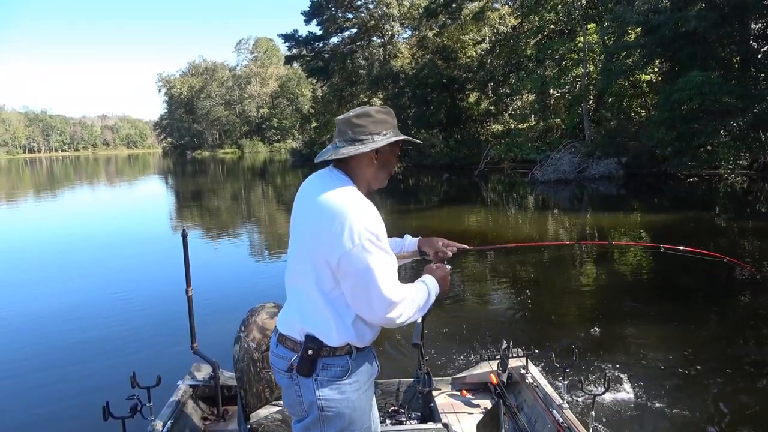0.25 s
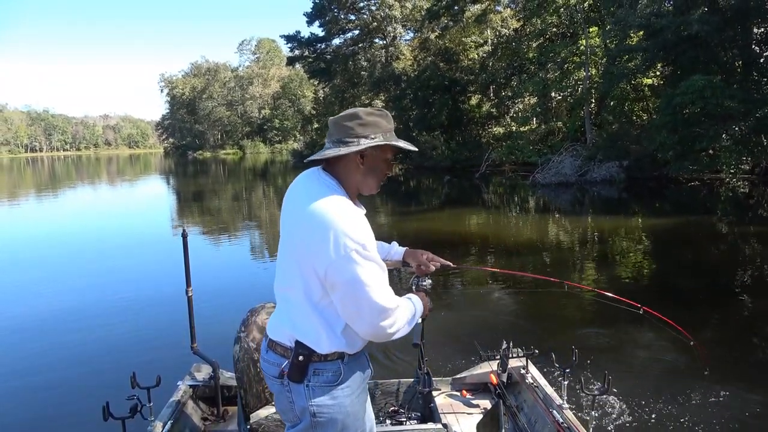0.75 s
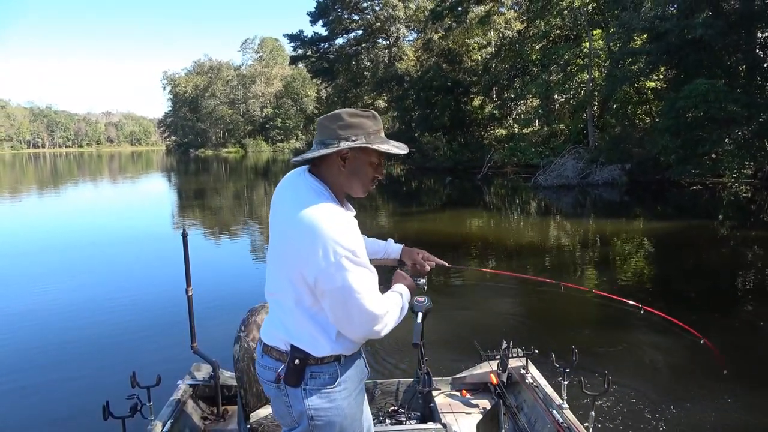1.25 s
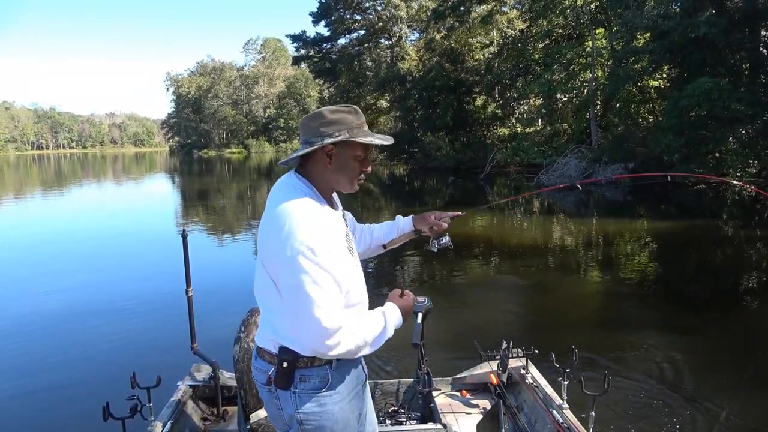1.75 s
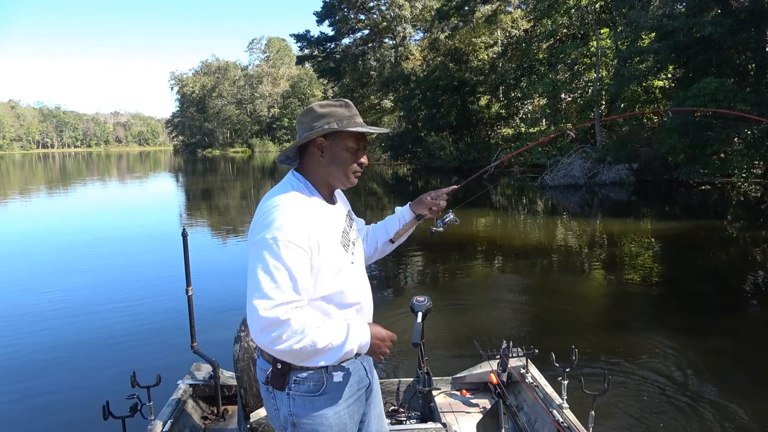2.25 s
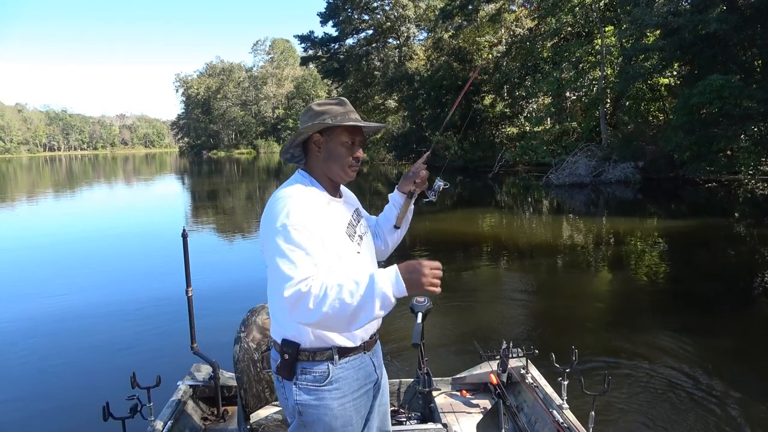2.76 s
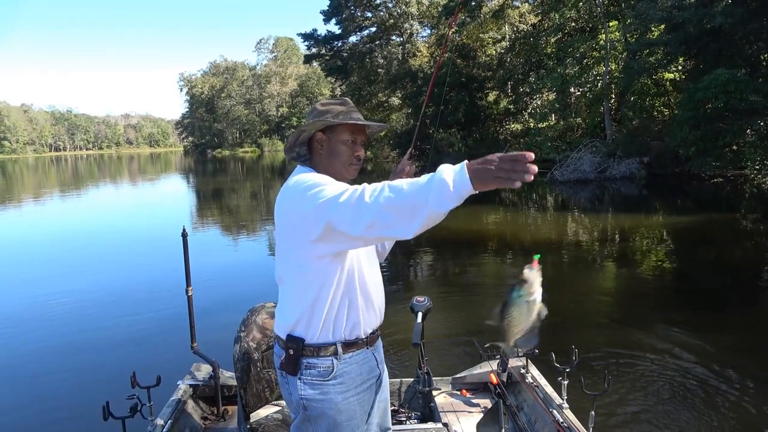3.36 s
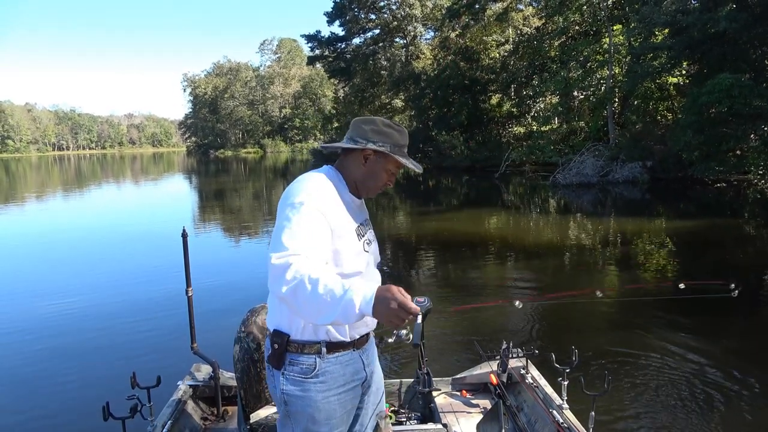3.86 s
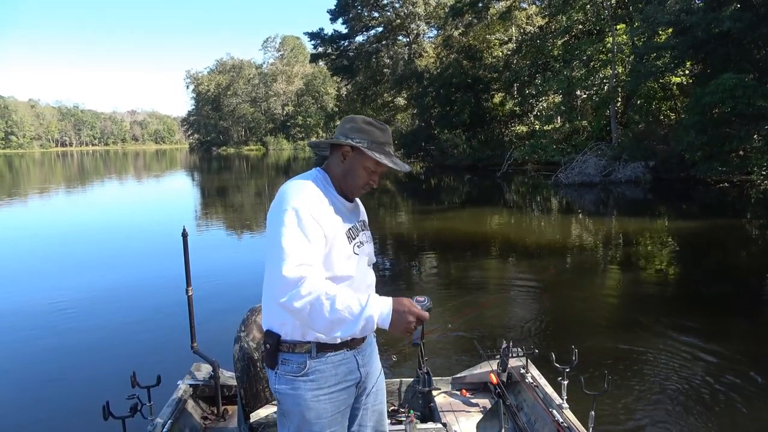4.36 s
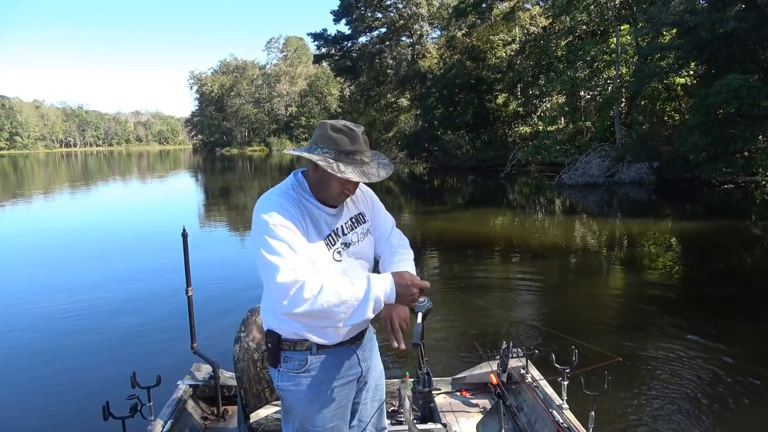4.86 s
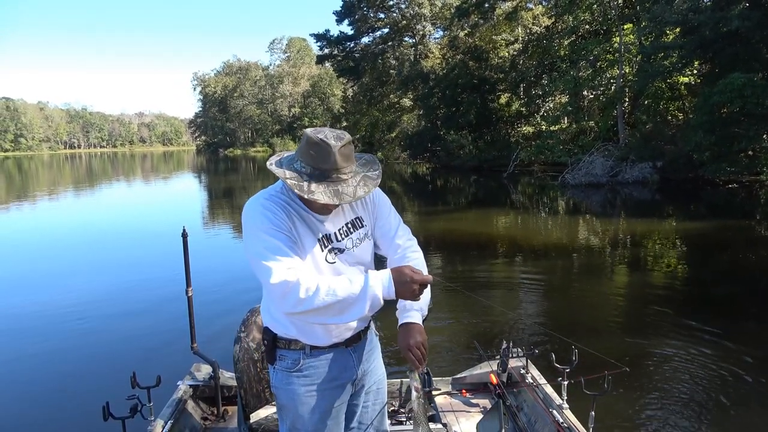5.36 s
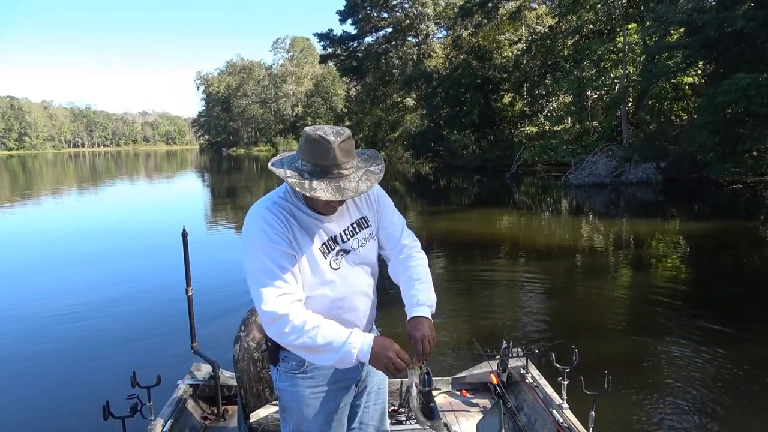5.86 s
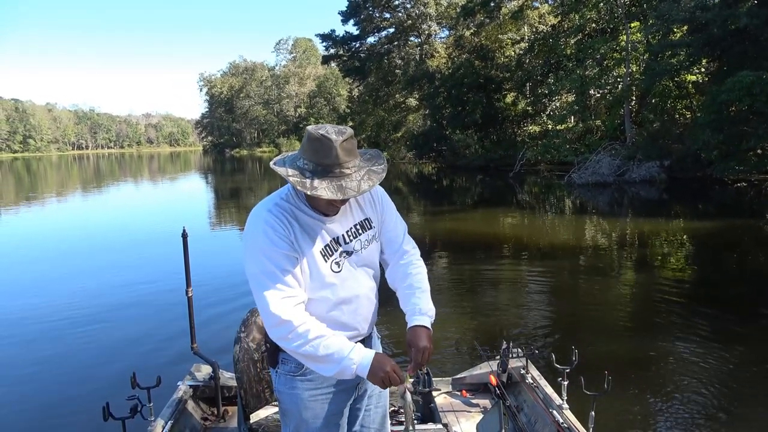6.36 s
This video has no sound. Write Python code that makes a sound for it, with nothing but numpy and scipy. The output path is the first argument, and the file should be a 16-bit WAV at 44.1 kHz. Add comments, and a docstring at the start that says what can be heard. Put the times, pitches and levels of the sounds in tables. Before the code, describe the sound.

A fish thrashes at the surface right from the start, with a loud burst of bubbling splash, spray, gurgles and smacks that thins to drips within about two seconds. Then line and reel tick, sleeves rustle, and feet and gear knock the hull. Near the end hard tackle clacks snap over the deck. Calm open lake, very soft airy hush, fairly close microphone, mono.

```python
"""A hooked fish thrashes beside a small boat on a calm lake, under a soft open-air hush of shaped noise.
Water: clouds of ringing bubbles, quick rising squirts, gurgles and spray; then a lift out, dripping.
Line and reel tick (noise snaps), clothes rustle (dense slips), line squeaks, feet and gear bump the hull (modes).
Late on, hard clacks of tackle ring close by over the deck, and a faint thin whine flutters between them."""
import sys
import numpy as np
from scipy import signal
from scipy.fft import rfft, irfft
from scipy.io import wavfile

SR = 44100
rng = np.random.default_rng(int(sys.argv[2]) if len(sys.argv) > 2 else 0)


def unload_wav(signal):
    """Save mono or channel-first audio to the path in sys.argv[1] as 16-bit WAV at rate SR, clipped to [-1, 1]."""
    wavfile.write(
        sys.argv[1],
        SR,
        np.round(np.clip(np.atleast_2d(signal).T, -1, 1) * 32767).astype(np.int16),
    )


N = 291280
T = np.arange(N) / SR
AGE = T[:int(.4 * SR)]  # time axis of one short event


def amp(db):
    """Decibels to gain."""
    return 10 ** (np.asarray(db) / 20)


def unit(x):
    """Scale to rms 1."""
    return x / np.sqrt(np.mean(x ** 2))


def fade(t60_s):
    """Exponential decay, -60 dB at t60_s."""
    return np.exp(-np.log(1000) * AGE / max(t60_s, 1e-4))


def swell_fade(t, swell_s, t60_s):
    """Smooth rise, then exponential decay."""
    rise = np.sin(np.pi / 2 * np.minimum(t / swell_s, 1)) ** 2
    return rise * np.exp(-np.log(1000) * np.maximum(t - swell_s, 0) / t60_s)


def surge(start_s, swell_s, t60_s, hold_s=0):
    """Envelope of one movement: swell, optional hold, decay."""
    age = np.maximum(T - start_s, 0)
    held_age = age - np.clip(age - swell_s, 0, hold_s)
    return swell_fade(held_age, max(swell_s, 1e-4), t60_s)


def add(out, start_s, sound):
    """Mix a sound in at start_s."""
    i = max(int(start_s * SR), 0)
    out[i:i + len(sound)] += sound[:N - i]


def colour(x, points):
    """Causal minimum-phase filter through (Hz, dB) points, unit gain for white noise."""
    hz, db = np.transpose(points)
    size = 8192
    log_bins = np.log(np.fft.rfftfreq(size, 1 / SR) + 1)
    log_gain = np.log(amp(np.interp(log_bins, np.log(hz), db)))
    cepstrum = irfft(log_gain)
    cepstrum[1:size // 2] *= 2  # fold to minimum phase
    cepstrum[size // 2:] = 0
    response = irfft(np.exp(rfft(cepstrum)))
    return signal.fftconvolve(x, response / np.linalg.norm(response))[:len(x)]


def walk(points_per_s):
    """Random points joined by lines, rms 1."""
    points = rng.standard_normal(int(T[-1] * points_per_s) + 2)
    return unit(np.interp(T * points_per_s, np.arange(len(points)), points))


def crackle(hits_per_s, spread_db):
    """Dense tiny impacts of uneven size and random sign, rms 1."""
    size = amp(spread_db * np.minimum(rng.exponential(size=N), 4))
    hits = rng.random(N) < hits_per_s / SR
    return unit(hits * size * rng.choice([-1, 1], N))


def ring(modes):
    """Free ringing of a struck object: decaying sine modes, starting at about rms 1."""
    waves = np.zeros(len(AGE))
    for hz, db, t60_s in modes:
        waves += amp(db) * fade(t60_s) * np.sin(2 * np.pi * hz * AGE + rng.uniform(0, 2 * np.pi))
    return waves / np.sqrt(sum(amp(db) ** 2 for _, db, _ in modes) / 2)


def band(hz, points_per_s):
    """Narrow noise around a pitch curve: two random walks on a quadrature carrier, about rms 1."""
    phase = 2 * np.pi * np.cumsum(hz * np.ones(N)) / SR
    return walk(points_per_s) * np.sin(phase) + walk(points_per_s) * np.cos(phase)


def echo(x, t60_s, points):
    """Diffuse reflections: convolution with a coloured, decaying noise tail."""
    tail = rng.standard_normal(len(AGE)) * fade(t60_s) * (1 - np.exp(-AGE / 0.0013))
    tail = colour(tail, points)
    return signal.fftconvolve(x, tail / np.linalg.norm(tail))[:N]


# hush spectrum: pitch_hz [Hz], density_db [dB per Hz, relative]
AIR_SPECTRUM = [(12, -46), (20, 5.5), (44, -5), (101, -8), (134, -11.5), (168, -9.5), (459, -11),
                (499, -11), (780, -6), (1610, -23), (3340, -29.5), (3840, -30.5), (5080, -34),
                (7310, -40.5), (16000, -42)]
AIR_DB = -47.5


def air():
    """Hush of distant trees over open water: coloured noise, gently wavering."""
    hush = unit(colour(rng.standard_normal(N), AIR_SPECTRUM))
    return amp(AIR_DB + .5 * walk(2.78)) * hush


def bubble(hz, swell_s, t60_s, glide_octaves_per_s):
    """Trapped air swells into ringing and dies away while its pitch slides."""
    t = AGE[:int((swell_s + t60_s) * SR) + 2]
    pitch_hz = np.minimum(hz * 2 ** (glide_octaves_per_s * t), SR / 3)
    return swell_fade(t, swell_s, t60_s) * np.sin(2 * np.pi * np.cumsum(pitch_hz) / SR)


WATER_END_S = 2.4


def cloud(low_hz, high_hz, cycles, spread_db, rise_octaves, count):
    """Many bubbles up to WATER_END_S, lower ones ringing longer; most rise in pitch, some sink."""
    out = np.zeros(N)
    for k, (when, pitch, life, size, slide) in enumerate(rng.random((count, 5))):
        hz = low_hz * (high_hz / low_hz) ** pitch
        t60_s = cycles * (.5 + life) / hz
        sound = bubble(hz, t60_s * 0.17, t60_s, rise_octaves * (slide - .25) / t60_s)
        gain = amp(spread_db * size ** 3) * np.sqrt(hz)
        add(out, (k + when) / count * WATER_END_S, gain * sound)
    return out / np.sqrt(np.mean(out[T < WATER_END_S] ** 2))


# foam and mist spectra: pitch_hz [Hz], density_db [dB per Hz, relative]
FOAM_COLOUR = [(40, -31), (150, -21), (280, -20), (480, -6.5), (1100, -3), (1700, -8.5), (2800, -4.5),
               (8000, -31)]
MIST_COLOUR = [(100, -70), (700, 0), (1400, 4.5), (2200, 3), (3600, -8.5), (5400, -4), (7000, -14),
               (10000, -21.5), (14000, -28), (16000, -30)]
# three thrashes, a swirl, the lift out: start_s [s], swell_s [s], t60_s [s], churn_db [dB], spray_db [dB]
WATER_SURGES = [(0.0, 0.001, 0.58, -21.5, -33), (0.089, 0.12, 0.68, -38, -38.5),
                (.24, 0.21, 2.04, -45, -35.5), (.98, 0.17, 0.67, -48.5, -68), (1.6, 0.38, 1.46, -62, -47.5)]


def splash():
    """Fish churns large bubbles and foam, throws small bubbles and mist; each movement is a surge."""
    large = cloud(377.4, 1955, cycles=20.5, spread_db=16.5, rise_octaves=0.84, count=1200)
    small = cloud(1400, 5400, cycles=28, spread_db=15, rise_octaves=.45, count=2600)
    foam = colour(crackle(3000, 1.1), FOAM_COLOUR)
    mist = colour(crackle(2500, 4.06), MIST_COLOUR) * amp(4.4 * walk(59.27))
    churn = large + .5 * foam
    spray = small + .9 * mist
    out = np.zeros(N)
    for start_s, swell_s, t60_s, churn_db, spray_db in WATER_SURGES:
        water = amp(churn_db) * churn + amp(spray_db) * spray
        out += surge(start_s, swell_s, t60_s) * water
    return out


BUBBLE_SWELL_SHARE, BUBBLE_RISE_OCTAVES = 0.041, 0.24  # both per t60


def gulp(hz, cycles):
    """Bubble under water: lower pitch swells and fades slower; pitch rises as it floats up."""
    t60_s = cycles / hz
    return bubble(hz, BUBBLE_SWELL_SHARE * t60_s, t60_s, BUBBLE_RISE_OCTAVES / t60_s)


# single bubbles, low and high: start_s [s], pitch_hz [Hz], peak_db [dB], cycles [cycles per t60]
CLEAR_BUBBLES = [(0, 770, -9.5, 9.2), (.0135, 755, -17, 12), (.017, 960, -11, 34), (0.0937, 556, -12.5, 26),
                 (.135, 1240, -22, 50), (.2, 1240, -15, 21), (.199, 438, -24.5, 39),
                 (.207, 281, -28.5, 12.5), (0.227, 556, -21, 27), (.268, 1027, -24, 35),
                 (.379, 1107, -19.5, 52), (0.4274, 970, -11, 28), (.687, 780, -26, 30),
                 (.733, 838, -23.5, 55), (.821, 3250, -25.5, 60), (.849, 880, -23.5, 20),
                 (1.285, 920, -35.5, 104), (1.947, 1390, -17, 10.7), (1.984, 875, -28, 55),
                 (1.998, 2930, -20, 17)]


def clear_bubbles():
    """Clear single bubbles, low and high, in the churned water and under falling drops."""
    out = np.zeros(N)
    for start_s, pitch_hz, peak_db, cycles in CLEAR_BUBBLES:
        add(out, start_s, amp(peak_db) * gulp(pitch_hz, cycles))
    return out


# air pockets pinching shut: start_s [s], start_hz [Hz], end_hz [Hz], peak_db [dB]
SQUIRT_SWEEPS = [(.072, 2800, 4800, -27), (.137, 1780, 5800, -25), (0.161, 3700, 3980, -24),
                 (.36, 2410, 5670, -27.5), (.394, 2300, 6500, -28), (0.484, 1940, 3470, -20),
                 (.6038, 1775, 5640, -16.5), (.788, 4700, 9800, -30), (.799, 4500, 6760, -28),
                 (1.849, 5430, 8200, -42.5), (1.938, 3840, 5330, -33)]
SQUIRT_S = 0.00737


def squirts():
    """Air pockets pinch shut: short sine sweeps, rising geometrically."""
    out = np.zeros(N)
    for start_s, start_hz, end_hz, peak_db in SQUIRT_SWEEPS:
        hz = np.geomspace(start_hz, end_hz, int(SQUIRT_S * SR))
        sweep = np.hanning(len(hz)) * np.sin(2 * np.pi * np.cumsum(hz) / SR)
        add(out, start_s, amp(peak_db) * sweep)
    return out


# falling spray sheets: start_s [s], level_db [dB], swell_s [s], t60_s [s]
SPRAY_SHEETS = [(.076, -28.5, 0.0064, 0.083), (.199, -29.5, .001, 0.048), (0.281, -28, 0.018, 0.16),
                (.752, -33.5, .003, 0.1), (1.822, -40, 0.0039, 0.095), (1.984, -38, 0.019, 0.15)]
# patter spectrum: pitch_hz [Hz], density_db [dB per Hz, relative]
PATTER_COLOUR = [(200, -17), (1200, -22), (2200, 7.5), (5400, 2), (7000, -11.5), (10000, -15), (14000, -27),
                 (16000, -26)]


def sheets():
    """Sheets of spray fall back: enveloped patter of dense tiny impacts."""
    out = np.zeros(N)
    patter = colour(crackle(5000, 2.5), PATTER_COLOUR)
    for start_s, level_db, swell_s, t60_s in SPRAY_SHEETS:
        piece = patter[int(start_s * SR):][:len(AGE)]
        add(out, start_s, amp(level_db) * swell_fade(AGE, swell_s, t60_s) * piece)
    return out


# bubble runs: start_s [s], length_s [s], first_hz [Hz], last_hz [Hz], mean_peak_db [dB]
GURGLE_RUNS = [(0.101, .13, 924, 399, -32.5), (0.349, 0.053, 696, 1050, -30), (.487, 0.069, 1375, 995, -26),
               (.665, 0.062, 595, 1180, -28.5)]
GURGLE_BUBBLES_PER_S, GURGLE_CYCLES = 65, 35


def gurgles():
    """Runs of gulps at uneven intervals, stepping from first to last pitch with detune."""
    out = np.zeros(N)
    for start_s, length_s, first_hz, last_hz, mean_peak_db in GURGLE_RUNS:
        for k, (late, detune, size) in enumerate(rng.uniform(-1.03, 1, (16, 3))):
            along = (k + 0.294 * late) / GURGLE_BUBBLES_PER_S / length_s
            if along < 1:
                hz = first_hz * (last_hz / first_hz) ** along * (1 + 0.054 * detune)
                sound = amp(mean_peak_db + 2.4 * size) * gulp(hz, GURGLE_CYCLES)
                add(out, start_s + along * length_s, sound)
    return out


def smacks(hits):
    """Surface impacts: (start_s, peak_db) hits convolved with a coloured click of peak 1."""
    impacts = np.zeros(N)
    for start_s, peak_db in hits:
        add(impacts, start_s, amp([peak_db]))
    points = [(60, -43), (400, -27), (1500, -13), (3800, 13), (5500, 4), (7500, -21), (16000, -21)]
    smack = colour(signal.unit_impulse(len(AGE)), points)
    return signal.fftconvolve(impacts, smack / np.abs(smack).max())[:N]


# sharp smacks on the surface: start_s [s], peak_db [dB]
SURFACE_SMACKS = [(0.299, -17), (0.3228, -19), (.8495, -21.5), (1.0267, -12), (1.948, -28), (1.9976, -33)]


def surface_smacks():
    """Sharp surface smacks, some sounding together with a bubble of CLEAR_BUBBLES."""
    return smacks(SURFACE_SMACKS)


# droplets on the boat: start_s [s], level_db [dB]
BOAT_SPITS = [(.79, -22), (.864, -21), (1.0935, -19.5), (1.121, -27), (2.005, -36)]


def spits():
    """Fine droplets spit on the boat: bright clicks."""
    out = np.zeros(N)
    click = colour(signal.unit_impulse(len(AGE)), [(1500, -34), (6000, -4), (11000, -4.5), (16000, 0.5)])
    for start_s, level_db in BOAT_SPITS:
        add(out, start_s, amp(level_db) * click)
    return out


# drips trapping a bubble: start_s [s], pitch_hz [Hz], ring_peak_db [dB], impact_peak_db [dB]
RINGING_DRIPS = [(.8805, 812, -28, -23.5), (.888, 2720, -21, -16.5), (.925, 1380, -31.5, -43),
                 (.9925, 1427, -24.5, -24.5), (1.0934, 1290, -28, -34), (1.1725, 1240, -27.5, -36),
                 (1.662, 2090, -40, -48), (1.814, 2420, -35, -36), (1.831, 1253, -30.5, -36),
                 (2.07, 2750, -35, -46), (2.103, 2174, -27, -47), (2.1453, 2410, -22.5, -36)]
DRIP_CYCLES, DRIP_SWELL_S, DRIP_GLIDE_OCTAVES_PER_S = 68, 0.0004, -1.9


def drips():
    """Drips strike the surface and trap a ringing bubble that sinks in pitch."""
    out = smacks([(start_s, impact_db) for start_s, _, _, impact_db in RINGING_DRIPS])
    for start_s, hz, ring_db, _ in RINGING_DRIPS:
        sound = bubble(hz, DRIP_SWELL_S, DRIP_CYCLES / hz, DRIP_GLIDE_OCTAVES_PER_S)
        add(out, start_s, amp(ring_db) * sound)
    return out


def plops():
    """Single bubbles, squirts, gurgles, smacks and drips, plus a short scatter off the side of the boat."""
    direct = clear_bubbles() + squirts() + gurgles() + surface_smacks() + drips()
    scatter = echo(direct, 0.031, [(500, 0.61), (16000, -1.6)])
    return direct + amp(-12) * scatter


# tick spectra, body and bright edge: pitch_hz [Hz], density_db [dB per Hz, relative]
TICK_BODY_COLOUR = [(50, -37), (250, -12), (700, 9), (1500, 9.5), (2600, 4), (4000, 4), (6000, -6),
                    (10000, -42.5)]
TICK_EDGE_COLOUR = [(800, -33), (2500, -12.5), (4200, 15.5), (5400, 8.5), (7500, -1.5), (11000, -14.5),
                    (16000, -40.5)]
TICK_T60_S = 0.045


def tick(bright_db):
    """Sharp snap (impulse) with a short rattle (decaying noise) behind it."""
    burst = rng.standard_normal(len(AGE)) * fade(TICK_T60_S)
    burst[0] += 7
    body = colour(burst, TICK_BODY_COLOUR)
    edge = colour(burst, TICK_EDGE_COLOUR)
    return amp(-3.5) * (body + amp(bright_db) * edge)


# clearest ticks of line, reel, rod: start_s [s], gain_db [dB on tick()], bright_db [dB, edge re body]
CLEAR_TICKS = [(1.5142, -41.5, -7), (2.2948, -24.5, -17), (2.395, -28, -18), (2.412, -31.5, -3.5),
               (2.4653, -37, -3.5), (2.4915, -37, 2), (2.7052, -22, -9), (2.8485, -38.5, -5),
               (2.9685, -31, -6.5), (3.269, -41, -5.5), (3.3402, -48.5, 10.5), (3.658, -31, -12),
               (4.2505, -33, -18), (4.271, -37, -1), (4.4259, -27.5, -15), (4.4324, -28.5, -6),
               (4.563, -35, -26), (4.6105, -31.5, -17), (4.6694, -42, -0.5), (5.232, -41, -4.5),
               (5.4723, -42, -4), (5.9284, -39.5, 1)]
# handling the line: start_s [s], end_s [s], min_gain_db [dB on tick()]
FIDDLING_SPANS = [(1.402, 1.65, -49), (2.79, 2.89, -43), (3.2, 3.42, -52.5), (4.462, 4.7, -43.5),
                  (5.473, 5.54, -48)]
FIDDLE_TICKS_PER_S, FIDDLE_RANGE_DB, FIDDLE_BRIGHT_DB = 20, 6, -3


def ticks():
    """Line and reel tick: clear snaps, plus faint random ones while the line is handled."""
    out = np.zeros(N)
    for start_s, gain_db, bright_db in CLEAR_TICKS:
        add(out, start_s, amp(gain_db) * tick(bright_db))
    for start_s, end_s, min_gain_db in FIDDLING_SPANS:
        for k, (late, size) in enumerate(rng.random((8, 2))):
            tick_s = start_s + (k + late) / FIDDLE_TICKS_PER_S
            if tick_s < end_s:
                add(out, tick_s, amp(min_gain_db + FIDDLE_RANGE_DB * size) * tick(FIDDLE_BRIGHT_DB))
    return out


# arm movements: start_s [s], swell_s [s], hold_s [s], t60_s [s], body_gain_db [dB], hiss_gain_db [dB]
ARM_RUSTLES = [(2.164, .1, 0.062, .8, -42.5, -46), (3.711, .36, 0.056, .3, -38.5, -49),
               (4.244, .008, 0.028, 0.2, -48, -47.5), (4.408, 0.034, 0.025, 0.91, -42, -52.5)]
# cloth spectra, body and hiss: pitch_hz [Hz], density_db [dB per Hz, relative]
CLOTH_BODY_COLOUR = [(20, -11), (60, 1), (150, 9), (550, 13.5), (1000, 11.5), (1800, -5), (6000, -47)]
CLOTH_HISS_COLOUR = [(150, -41), (800, -14), (1500, 3.5), (2600, 6.5), (4000, 1.5), (5500, -3.5),
                     (7500, -15.5), (11000, -22), (14000, -21), (16000, -27)]


def rustles():
    """Sleeves and line rub in dense, uneven slips, low body plus hiss."""
    slips = crackle(3500, 3.1) * amp(2 * walk(60))
    body = amp(-1.5) * colour(slips, CLOTH_BODY_COLOUR)
    hiss = amp(2.0) * colour(slips + 0.48 * crackle(9000, 2.5), CLOTH_HISS_COLOUR)
    out = np.zeros(N)
    for start_s, swell_s, hold_s, t60_s, body_gain_db, hiss_gain_db in ARM_RUSTLES:
        rub = amp(body_gain_db) * body + amp(hiss_gain_db) * hiss
        out += surge(start_s, swell_s, t60_s, hold_s) * rub
    return out


# hull contacts: start_s [s], gain_db [dB on whole bump], t60_s [s], boom_db [dB re ringing]
HULL_BUMPS = [(2.395, -34.5, 0.31, -0.5), (3.7924, -19, 0.072, -13), (3.827, -24, 0.095, 0.5),
              (3.916, -30, 0.036, -13), (3.954, -29, 0.13, -21), (4.244, -29.5, 0.37, -7.5),
              (4.336, -38, 0.06, 6), (4.425, -22, 0.1, 5), (4.464, -27.5, 0.2, -4),
              (4.545, -32.5, 0.27, -2), (4.611, -20, 0.027, -3), (4.644, -31, 0.17, -4),
              (4.762, -32, 0.11, -3), (5.8588, -26, 0.093, -9)]
# hull modes: pitch_hz [Hz], level_db [dB, relative], t60_s [s]
HULL_MODES = [(229, -2.5, 0.092), (338, -7, 0.039), (510, 13, 0.022), (553, 0.5, 0.18), (660, -8, 0.097),
              (790, -0.5, 0.051), (1040, 4, 0.035)]
THUD_COLOUR = [(30, -16), (100, -13), (250, 3.5), (600, 12), (1000, 0), (2000, -13), (6000, -37.5)]
BOOM_COLOUR = [(20, -16), (40, -7), (85, -5), (150, -7.5), (300, -8.5), (900, -48), (4000, -55)]


def bumps():
    """Feet and gear bump the hull: a short push, then the hull rings and booms."""
    out = np.zeros(N)
    for start_s, gain_db, t60_s, boom_db in HULL_BUMPS:
        thud, boom = rng.standard_normal((2, len(AGE))) * fade(t60_s)
        thud[0] += 11
        thud = colour(thud, THUD_COLOUR)
        boom = colour(boom, BOOM_COLOUR)
        onset = 1 - np.exp(-AGE / 0.00026)
        hull = (ring(HULL_MODES) + amp(boom_db) * boom) * onset
        add(out, start_s, amp(gain_db - 6.5) * (hull + amp(-1.0) * thud))
    return out


SQUEAK_START_S, SQUEAK_SWELL_S, SQUEAK_HOLD_S, SQUEAK_T60_S, SQUEAK_DB = 4.44, 0.13, 0.27, .5, -59
SQUEAK_HZ, SQUEAK_SAG_OCTAVES_PER_S = 2930, .8


def squeak():
    """Line slides through the fingers: narrow noise whose pitch sinks as it slows."""
    age = np.maximum(T - SQUEAK_START_S, 0)
    hz = SQUEAK_HZ * 2 ** (-SQUEAK_SAG_OCTAVES_PER_S * age)
    envelope = surge(SQUEAK_START_S, SQUEAK_SWELL_S, SQUEAK_T60_S, SQUEAK_HOLD_S)
    return amp(SQUEAK_DB) * band(hz, points_per_s=500) * envelope


# tackle clacks: start_s [s], gain_db [dB on whole clack], chatter_s [s], t60_s [s], deck_db [dB on deck part]
TACKLE_CLACKS = [(5.8596, -17, 0.019, 0.05, -1), (6.2142, -19.5, 0.0098, 0.12, -3.5),
                 (6.4976, -26, 0.0079, 0.083, 0.5), (6.526, -39, 0.011, 0.041, 5.5)]
# tackle and deck modes: pitch_hz [Hz], level_db [dB, relative], t60_s [s]
TACKLE_MODES = [(2120, -23, .08), (2290, -4.5, 0.15), (2426, -2, 0.073), (2690, -16, .08),
                (3103, -0.5, 0.14), (3030, -28, 0.12), (3720, -1, 0.13), (3630, 1, 0.11), (3970, 9, 0.042),
                (4000, 1, 0.12), (4810, 4, 0.069), (5260, -16, .1), (4872, -6, 0.12), (5530, 5.5, 0.056),
                (6400, -2, 0.062), (6980, -1.5, 0.054)]
DECK_MODES = [(113, -22.5, .2), (309, -11, 0.14), (444, -10.5, 0.15), (517, 0, 0.097), (586, -5.5, 0.14),
              (815, -2, 0.12), (950, -7.5, 0.091), (1137, -15.5, 0.2)]
# contact spectrum: pitch_hz [Hz], density_db [dB per Hz, relative]
CONTACT_COLOUR = [(60, -29), (700, -19), (1200, -5), (1650, -10), (2300, -1.5), (4000, -1), (5500, -2.5),
                  (6500, -15), (8000, -18), (10500, -18.5), (14000, -20), (16000, -33)]
DECK_THUD_COLOUR = [(40, -4), (130, -3), (220, -3), (500, 4.5), (1000, 2), (1700, -21), (6000, -53)]
SHORE_COLOUR = [(200, 13.5), (700, 0.5), (2000, -5.5), (5000, -18.5), (8000, -14), (14000, -27)]


def clacks():
    """Hard parts snap and chatter briefly; the deck answers later and lower, the shore faintly."""
    out = np.zeros(N)
    for start_s, gain_db, chatter_s, t60_s, deck_db in TACKLE_CLACKS:
        contact = np.minimum(1, fade(t60_s) * amp(60 * chatter_s / t60_s))  # full for chatter_s, then decays
        burst = crackle(2500, 1.7)[:len(AGE)] * contact
        burst[0] += 7
        hard = amp(-5.5) * colour(burst, CONTACT_COLOUR) + amp(-0.5) * ring(TACKLE_MODES)
        thud = colour(rng.standard_normal(len(AGE)) * contact, DECK_THUD_COLOUR)
        deck = (ring(DECK_MODES) + amp(-7.0) * thud) * (1 - np.exp(-AGE / 0.012))
        add(out, start_s, amp(gain_db) * (hard + amp(deck_db) * deck))
    return out + amp(-15.5) * echo(out, 0.53, SHORE_COLOUR)


# thin high tones: pitch_hz [Hz], level_db [dB, relative]
WHINE_TONES = [(3420, -6.5), (5590, -5), (7100, -16), (8950, -18), (11600, -26), (14700, -28)]
WHINE_START_S, WHINE_SWELL_S, WHINE_T60_S, WHINE_GAIN_DB = 5.91, 0.32, 2.6, -57
WHINE_FLICKER_DB, WHINE_FLICKERS_PER_S = 3.5, 55


def whine():
    """Thin, unsteady high tones (narrow noise bands) under one common flicker."""
    flicker = amp(WHINE_GAIN_DB + WHINE_FLICKER_DB * walk(WHINE_FLICKERS_PER_S))
    level = flicker * surge(WHINE_START_S, WHINE_SWELL_S, WHINE_T60_S)
    return level * sum(amp(level_db) * band(hz, points_per_s=180) for hz, level_db in WHINE_TONES)


def scene():
    """Sum of all sources, one channel."""
    water = splash() + sheets() + spits() + plops()
    handling = ticks() + rustles() + bumps() + squeak()
    return (air() + water + handling + clacks() + whine())[None]


TOP_HZ = 15900


def record(dry):
    """Thin the deepest rumble with a 30 Hz high-pass; cut steeply above TOP_HZ."""
    thinned = signal.sosfilt(signal.butter(2, 30, "high", fs=SR, output="sos"), dry)
    return signal.sosfilt(signal.ellip(10, .2, 70, TOP_HZ, fs=SR, output="sos"), thinned)


dry = scene()
out = record(dry)
unload_wav(out)
```